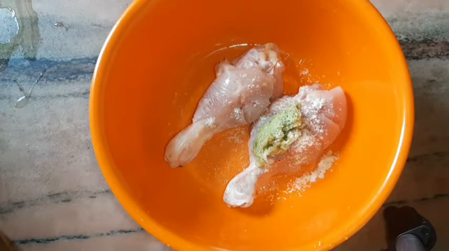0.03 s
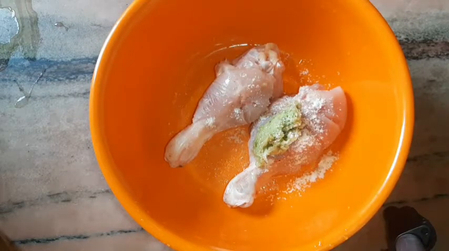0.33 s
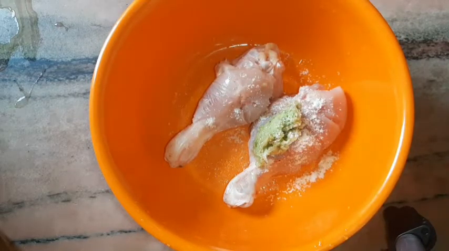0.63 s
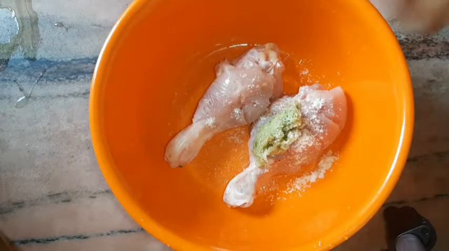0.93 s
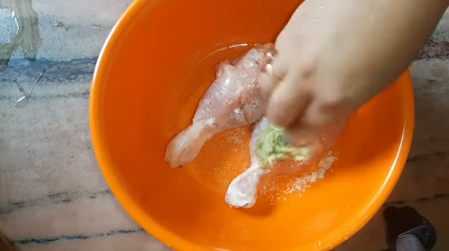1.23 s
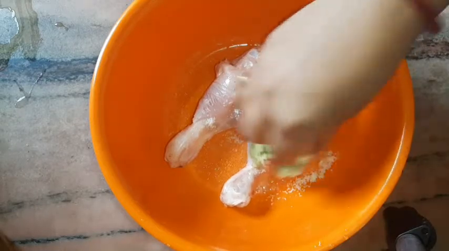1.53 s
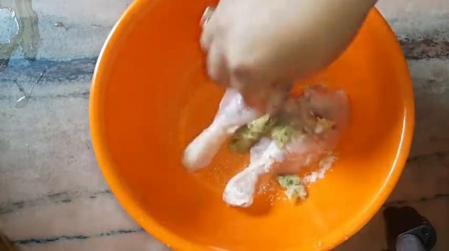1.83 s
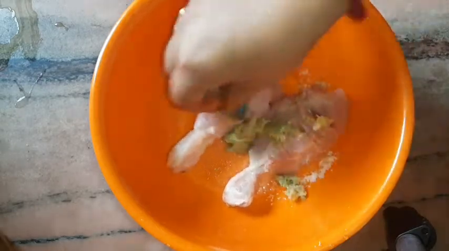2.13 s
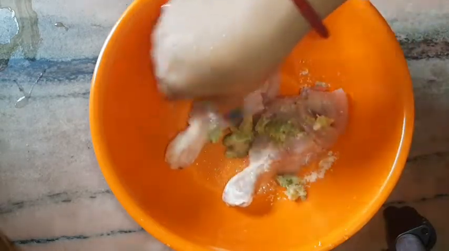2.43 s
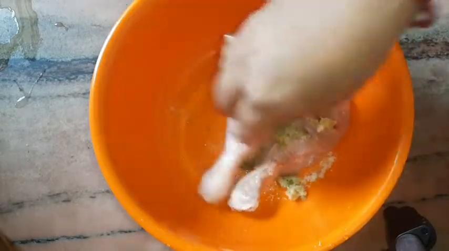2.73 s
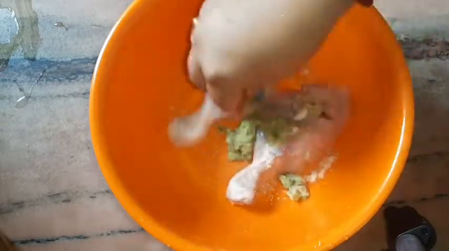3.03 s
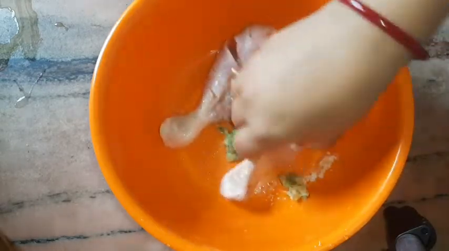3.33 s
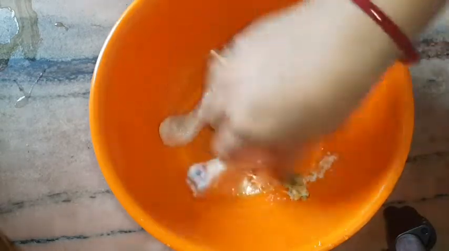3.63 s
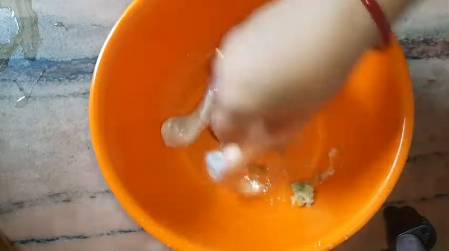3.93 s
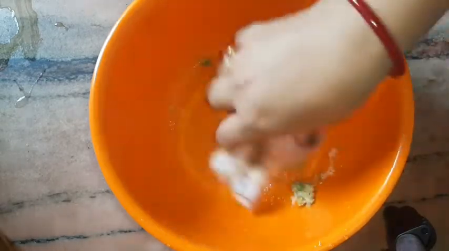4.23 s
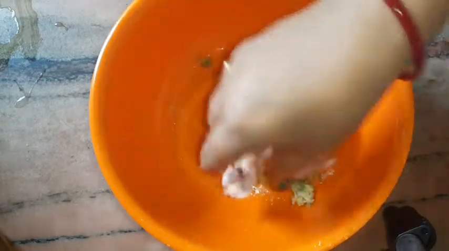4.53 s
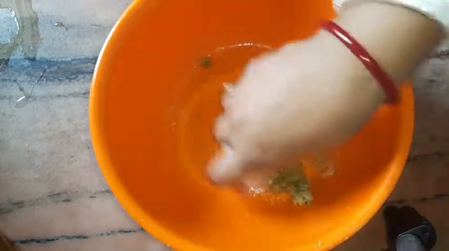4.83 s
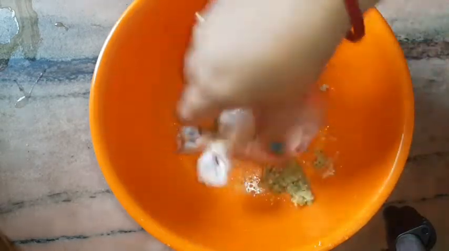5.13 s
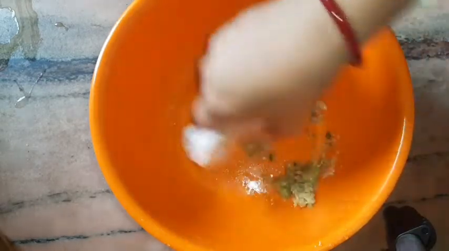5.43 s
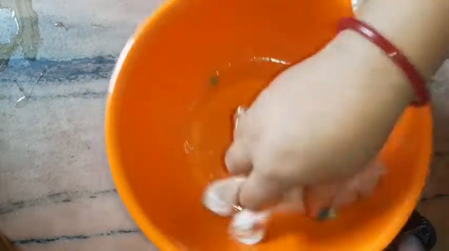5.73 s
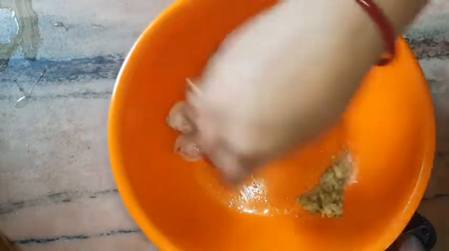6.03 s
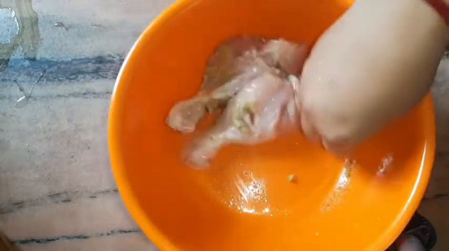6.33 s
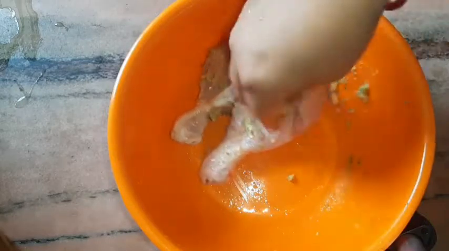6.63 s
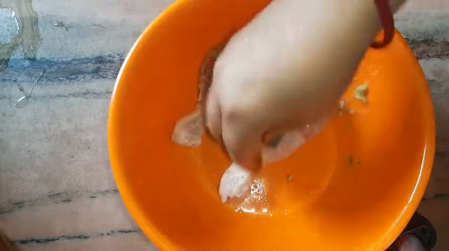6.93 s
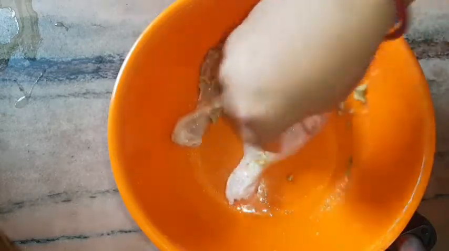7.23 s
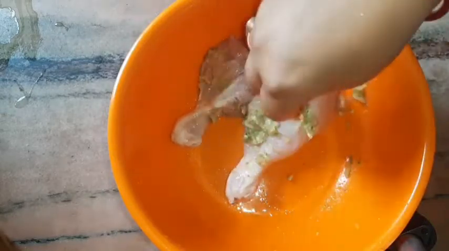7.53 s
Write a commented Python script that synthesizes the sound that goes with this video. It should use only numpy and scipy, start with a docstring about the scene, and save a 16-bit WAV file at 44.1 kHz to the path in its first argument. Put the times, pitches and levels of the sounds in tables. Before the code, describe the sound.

A hand kneads raw chicken in a plastic bowl, with wet smacks, soft thuds and sharp bangle clacks over a faint hiss.

```python
"""Rubbing paste into chicken

A hand kneads raw chicken in a plastic bowl on a stone counter, close by. The meat thuds on the bowl's
modes, wet skin smacks, air pockets pop, a bangle clacks on the rim, and once the bowl skids in a
stick-slip judder. Behind it a small kitchen rumbles and a thin jet, like steam leaking from a pot lid,
hisses and whistles faintly."""
import sys
import numpy as np
from scipy import signal
from scipy.fft import rfft, irfft, next_fast_len
from scipy.io import wavfile
from scipy.ndimage import uniform_filter1d, map_coordinates

SR = 44100
rng = np.random.default_rng(int(sys.argv[2]) if len(sys.argv) > 2 else 0)


def store_wav(level_fs):
    """Save 16-bit WAV to argv[1]."""
    pcm = np.round(np.clip(np.atleast_2d(level_fs), -1, 1) * 32767)
    wavfile.write(sys.argv[1], SR, pcm.T.astype(np.int16))


N = 338688
TOP_HZ = 15800
RING_T = np.arange(SR // 3) / SR  # time since a contact [s]

# knocks on the bowl, thuds of meat and hand, then jolts as it skids: (time [s], level [dB], pitch [Hz])
BUMP_HITS = [(1.894, -51.5, 716), (2.475, -43, 450), (2.56, -36.5, 805), (2.741, -45, 590),
             (3.257, -43.5, 574), (3.887, -45.5, 597), (4.055, -42, 663), (4.157, -52, 706),
             (4.404, -53, 810), (4.555, -51, 720), (4.675, -47, 750), (5.0, -51.5, 570),
             (5.156, -44.5, 810), (5.182, -47.5, 860), (5.293, -48, 830), (5.309, -51, 700),
             (5.406, -51.5, 656), (5.585, -30, 460), (5.648, -36, 533), (5.68, -29, 1534), (5.73, -30, 474),
             (5.792, -36, 395)]
# wet skin slapping and tearing loose: (time [s], level [dB], low edge [Hz], high edge [Hz])
SMACK_HITS = [(2.476, -42.5, 1380, 6670), (2.56, -52, 1090, 2620), (3.257, -36.5, 2800, 15000),
              (3.5221, -34.5, 2600, 9000), (4.0543, -35, 3540, 15300), (4.147, -49, 3480, 13000),
              (4.157, -44, 3000, 13000), (4.676, -42, 2400, 15500), (4.876, -54, 1500, 3200),
              (5.157, -48.5, 1200, 2200), (5.181, -53, 1190, 3800), (5.308, -51.5, 1090, 4500),
              (5.585, -45, 1090, 4600), (5.641, -43.5, 1500, 12000), (6.254, -52, 3500, 5500),
              (7.339, -47, 4570, 15000)]
# dull contact: (frequency [Hz], density [dB])
THUD_SPECTRUM = [(80, -32), (250, -6.5), (450, 1), (650, 1), (900, -4), (1150, -8), (2500, -31),
                 (6000, -31.5)]


def amp(db):
    """Decibels to gain."""
    return 10 ** (np.asarray(db) / 20)


def unit(x):
    """Scale to rms 1."""
    return x / np.sqrt(np.mean(x ** 2) + 1e-20)


def struck(x):
    """Scale a blow to rms 1 over its first 10 ms."""
    return x / np.sqrt(np.mean(x[..., :SR // 100] ** 2) + 1e-20)


def since(s):
    """Time since s per sample, zero before it."""
    return np.maximum(np.arange(N) / SR - s, 0)


def along(points, hz):
    """Interpolate (frequency, value) points on a log axis."""
    knots_hz, values = np.transpose(points)
    return np.interp(np.log(hz + 1), np.log(knots_hz), values)


def curves(rows):
    """One value per sample for each column after the time."""
    s, *columns = np.transpose(rows)
    return [np.interp(since(0), s, column) for column in columns]


def wobble(rate_hz):
    """Smooth random curve with knots at rate_hz."""
    knots = rng.standard_normal(int(N * rate_hz / SR) + 4)
    return map_coordinates(knots, [np.arange(N) * rate_hz / SR])


def add(track, s, sound):
    """Mix a sound in at time s."""
    part = track[:, max(round(s * SR), 0):][:, :sound.shape[1]]
    part += sound[:, :part.shape[1]]


def band(low_hz, high_hz, tilt_db, skirt_db):
    """Spectrum tilted between two edges, falling skirt_db per octave outside."""
    return [(low_hz / 4, -2 * skirt_db), (low_hz, 0),
            (high_hz, tilt_db), (high_hz * 4, tilt_db - 2 * skirt_db)]


def colour(pair, spectrum):
    """Minimum-phase filter two independent signals and blend them to stereo."""
    # left-right likeness: (frequency [Hz], correlation [-])
    likeness = [(30, .4), (100, .75), (250, .6), (700, .35), (1500, .4), (3000, 0), (15000, -.05)]
    n = pair.shape[1]
    m = 2 * next_fast_len(n // 2 + 2048)
    hz = np.fft.rfftfreq(m, 1 / SR)
    cepstrum = irfft(np.log(amp(along(spectrum, hz))))
    cepstrum[1:m // 2] *= 2
    cepstrum[m // 2 + 1:] = 0
    shaped = rfft(pair, m) * np.exp(rfft(cepstrum))
    turn = np.arccos(np.clip(along(likeness, hz), -1, 1)) / 2
    mid, side = irfft(shaped * [np.cos(turn), np.sin(turn)])[:, :n]
    return np.array([mid + side, mid - side])


def noise(spectrum, envelope=1):
    """Stereo noise of rms 1, enveloped before it is coloured."""
    return unit(colour(envelope * rng.standard_normal((2, N)), spectrum))


def attack(rise_s):
    """Exponential onset of a contact."""
    return 1 - np.exp(-RING_T / rise_s)


def burst(spectrum, t60_s, rise_s):
    """A contact's dense, quickly dying vibration."""
    envelope = amp(-60 * RING_T / t60_s) * attack(rise_s)
    return struck(colour(envelope * rng.standard_normal((2, len(RING_T))), spectrum))


def patchy(x, depth_db=3.0):
    """Narrow patches of a noise swell and sink independently."""
    bins = signal.stft(x, nperseg=1024)[2]
    field = uniform_filter1d(rng.standard_normal(bins.shape[1:]), size=4, axis=0)
    field = uniform_filter1d(field, size=12, axis=1)
    return unit(signal.istft(bins * amp(depth_db * unit(field)), nperseg=1024)[1][:, :N])


def rumble(level_db=-59.0, drift_db=1.2):
    """Low kitchen background, drifting in level."""
    # room noise: (frequency [Hz], density [dB])
    spectrum = [(20, -25), (50, -17.5), (75, -1), (115, -4.5), (200, -11.5), (270, -19), (450, -19.5),
                (950, -29.5), (1300, -28.5), (1540, -24), (1750, -37), (2060, -27.5), (2300, -38),
                (3000, -49), (6000, -65)]
    return amp(level_db + drift_db * wobble(5)) * noise(spectrum)


def registers(hop_s=0.055, swell_s=0.0089, fade_db_per_s=5.5):
    """Whistle pitch [Hz] and level [dB]: after each hop it builds, glides and fades."""
    # register hops: (time [s], pitch [Hz], glide [Hz/s], level [dB])
    hops = [(0, 6370, -1050, -56), (.43, 9200, 2997.5, -61.5), (.68, 9850, -1200, -60),
            (.96, 10110, -700, -59), (1.8, 9480, -700, -62), (2.67, 6690, -400, -57),
            (2.77, 6610, -40, -51.5), (3.12, 6500, -51, -54), (3.33, 6680, 197.5, -57),
            (3.7, 7620, 1301, -65), (4.02, 9160, -260, -60.5), (5.92, 6600, -200, -55),
            (6.4, 6330, -100, -54), (6.71, 5990, -100, -57), (6.84, 8630, -48.5, -60.5),
            (7.58, 6670, -1400, -52)]
    start_s, hz, glide, db = np.transpose(hops)
    t = since(0)
    k = np.maximum(np.searchsorted(start_s, t, "right") - 1, 0)
    age_s = np.maximum(t - start_s[k], 0)
    pitch_hz = hz[k] + glide[k] * age_s
    level_db = db[k] - fade_db_per_s * age_s - 10 * np.exp(-age_s / swell_s)
    return uniform_filter1d(np.array([pitch_hz, level_db]), int(hop_s * SR) + 1, axis=1)


def whistle(hz, db, width_hz, airy_hz=8300, wander=0.0039, falter_db=1.5):
    """Wavering edge tone: narrow noise, a skirt of turbulence and a weak octave."""
    def partial(k, rate_hz):
        sides = [wobble(rate_hz) * np.cos(k * phase) + wobble(rate_hz) * np.sin(k * phase)
                 for _ in range(2)]
        return unit(np.array(sides))

    airy = (hz / airy_hz) ** 3  # turbulence-to-tone ratio
    unrest = np.minimum(airy, 1)
    detune = wander * unrest * (wobble(22) + wobble(7)) / np.sqrt(2)
    phase = 2 * np.pi * np.cumsum(hz * (1 + detune)) / SR
    octave = amp(-12) * (2 * hz < TOP_HZ) * partial(2, 1.3 * width_hz)
    gain = amp(db + falter_db * (wobble(16) + unrest * wobble(5)))
    tone = (partial(1, width_hz) + airy * partial(1, 8 * width_hz)) / np.hypot(1, airy)
    return gain * (tone + octave)


def steam():
    """A thin jet hisses and whistles on the edge of its gap."""
    # hiss following the leak's flow: (time [s], level [dB])
    flow = [(.37, -53), (.52, -57.5), (1.2, -58.5), (1.9, -57.5), (2.05, -55.5), (2.6, -53.5), (3.95, -52),
            (4.1, -56), (5.5, -54.5), (5.85, -52), (6.75, -53), (6.9, -55), (7.52, -56.5), (7.62, -52.5)]
    # body of the hiss: (frequency [Hz], density [dB])
    hiss_spectrum = [(1500, -34.5), (3000, -20), (5000, -11), (6300, -4), (7100, -1), (7900, -1.5),
                     (8600, -14.5), (10000, -21), (15000, -48)]
    # top of the hiss: (frequency [Hz], density [dB])
    fizz_spectrum = [(6000, -17.5), (9000, -2), (10500, 3.5), (11300, 4.5), (12200, 0), (14000, 0.5),
                     (15400, 7), (16000, -3.5)]
    # second, steadier whistle: (time [s], pitch [Hz], level [dB])
    overblow = [(0, 10820, -63.5), (2.6, 10700, -65.5), (3.4, 10730, -62), (3.9, 10400, -69),
                (4.3, 10550, -67), (6.1, 9880, -71), (6.5, 9880, -80)]
    hiss_db, = curves(flow)
    fizz_db = -56 + 0.94 * (hiss_db - hiss_db.mean())
    flutter_db = .4 * wobble(12)
    hiss = amp(hiss_db + flutter_db) * patchy(noise(hiss_spectrum))
    fizz = amp(fizz_db + flutter_db) * patchy(noise(fizz_spectrum))
    tones = whistle(*registers(), width_hz=95) + whistle(*curves(overblow), width_hz=70)
    return (hiss + fizz + tones) * amp([[.85], [-.85]])  # slightly left


def swishes(rough_db=1.0):
    """Sleeve and fingers brush along, each stroke in its own band."""
    # strokes: (centre [s], width [s], low edge [Hz], high edge [Hz], level [dB])
    strokes = [(0.787, 0.17, 2740, 7140, -57), (0.846, 0.18, 1300, 2400, -64.5),
               (1.76, 0.1, 6400, 8100, -55.5), (4.23, 0.067, 1400, 1670, -61),
               (4.257, 0.12, 11000, 15000, -52.5), (4.766, 0.14, 830, 1250, -58)]
    out = np.zeros((2, N))
    for s, width_s, low_hz, high_hz, db in strokes:
        swell = amp(db) * np.exp(-2 * ((since(0) - s) / width_s) ** 2)
        spectrum = band(low_hz, high_hz, tilt_db=-3.0, skirt_db=22)
        out += swell * noise(spectrum, amp(rough_db * wobble(200)))
    return out


def slither(level_db=-21.5, rise_s=0.031, t60_s=0.16):
    """Gain of the meat sliding to rest after each bump and smack."""
    power = np.zeros((1, N))
    t = np.arange(SR // 2) / SR
    envelope = (1 - np.exp(-t / rise_s)) * amp(-60 * t / t60_s)
    for s, db, *_ in BUMP_HITS + SMACK_HITS:
        add(power, s, (amp(db) * envelope[None] / envelope.max()) ** 2)
    return amp(level_db) * np.sqrt(power[0])


def rubbing(spread_db_per_s=2.5, smear_db=-4):
    """Fingers drag and knead the meat; the paste crackles in clumps, more as it spreads."""
    # hand effort: (time [s], level [dB])
    effort = [(1.2, -73.5), (1.78, -63.5), (2.0, -77), (2.49, -69.5), (2.65, -61), (3.15, -57),
              (3.61, -66.5), (3.85, -59), (4.4, -61.5), (5.62, -64), (5.89, -58), (5.99, -63), (6.89, -66),
              (7.55, -71.5)]
    # paste crackle: (frequency [Hz], density [dB])
    paste_spectrum = [(700, 5), (1500, -4.5), (2200, 12), (3000, 11), (4500, 16.5), (7000, -32),
                      (15000, -18)]
    # kneading: (frequency [Hz], density [dB])
    knead_spectrum = [(50, -19.5), (130, 4.0), (220, -11.0), (500, -10.5), (2000, -76.0)]
    effort_db, = curves(effort)
    effort_db -= effort_db.mean()
    elapsed_s = since(effort[0][0])
    sliding, clumps = slither(), wobble(25)
    grains = amp(0.93 * wobble(1100) + 2 * clumps)
    drag_gain = np.hypot(amp(-77 + 1.57 * effort_db), sliding)
    drag = drag_gain * noise(THUD_SPECTRUM, amp(2.5 * np.tanh(clumps)))
    spread_db = spread_db_per_s * (elapsed_s - elapsed_s.mean())
    paste_gain = np.hypot(amp(-75.5 + 1.3 * effort_db + spread_db), amp(smear_db) * sliding)
    paste = paste_gain * noise(paste_spectrum, grains)
    knead = amp(-62 + 0.7 * effort_db) * noise(knead_spectrum, amp(9.9 * np.tanh(wobble(19))))
    fade_in = np.minimum(10 * elapsed_s, 1)
    return fade_in * (drag + paste + knead)


def bangle_ring(ping_hz, damping, favour_db=4, favour_width_hz=130):
    """Short bright modes; the contact point favours those near ping_hz."""
    # bangle on the rim: (frequency [Hz], level [dB], t60 before damping [s])
    mode_table = [(3560, -5, .022), (3680, -7, .025), (3798, -3, .03), (3953, -1, .042), (4113, -1, .036),
                  (4263, -2, .038), (4540, -3, .034), (5790, -9, .034), (6013, -7, .036), (6380, -5, .032),
                  (6720, -8, .028), (7800, -9, .034)]
    hz, db, t60_s = np.transpose(mode_table)[:, :, None]
    boost_db = favour_db / (1 + ((hz - ping_hz) / favour_width_hz) ** 2)
    gain = amp(db + boost_db + rng.normal(0, 1.5, (2, *hz.shape)))
    phase = rng.uniform(0, 2 * np.pi, gain.shape)
    modes = gain * amp(-60 * RING_T * damping / t60_s) * np.sin(2 * np.pi * hz * RING_T + phase)
    return struck(modes.sum(1) * attack(0.0011))


def bowl_modes(damping, focus_hz, focus_db_per_oct):
    """Separate modes, damped by meat and hand; a blow drives those near focus_hz most."""
    # plastic bowl: (frequency [Hz], level [dB], t60 before damping [s])
    mode_table = [(348, -1, .25), (385, -8, .12), (425, -9, .1), (464, 0, .22), (533, -3, .12),
                  (603, -3, .17), (695, 1, .18), (780, -3, .2), (821, -8, .2), (861, -9, .17),
                  (903, -8, .2), (1281, -13, .12), (1429, -12, .12), (1534, -4, .13), (1670, -15, .11),
                  (2040, -14, .1)]
    hz, db, t60_s = np.transpose(mode_table)[:, :, None]
    gain = amp(db + rng.normal(0, 1.5, hz.shape) - focus_db_per_oct * abs(np.log2(hz / focus_hz)))
    phase = rng.uniform(0, 2 * np.pi, hz.shape) + rng.normal(0, .6, (2, *hz.shape))
    return gain * amp(-60 * RING_T * damping / t60_s) * np.sin(2 * np.pi * hz * RING_T + phase)


def bowl_ring(damping, focus_hz, focus_db_per_oct):
    """The bowl struck once."""
    return struck(bowl_modes(damping, focus_hz, focus_db_per_oct).sum(1) * attack(0.00026))


def clacks():
    """The bangle hits the rim, pings, knocks the bowl's body and wall, and rebounds once."""
    # rim hits: (time [s], level [dB], rebound delay [s], rebound loss [dB], ping [Hz],
    # crack hardness [dB], wrist damping [-], left minus right [dB])
    hits = [(1.5592, -30.5, .0028, 9, 4550, 2, .5, 0), (2.9565, -21, .009, 12, 4120, 0.5, 1.2, -2),
            (3.2825, -24.5, .0105, 6, 4040, -2, 1.2, -1), (3.766, -22, .0065, 5, 3900, -2, 1.5, 3.5)]
    # hard contact: (frequency [Hz], density [dB])
    crack_spectrum = [(200, -66), (700, -3), (1150, -11.5), (2800, -16), (3600, 4.5), (4500, 0),
                      (5200, -2.5), (6300, 3.5), (8000, -2), (8800, -8), (11000, -5), (15500, -4.5)]
    out = np.zeros((2, N))
    for s, db, flight_s, loss_db, ping_hz, hard_db, damping, pan_db in hits:
        pan = amp([[pan_db / 2], [-pan_db / 2]])
        for at_s, hit_db in ((s, db), (s + flight_s, db - loss_db)):
            ping = amp(-2.5) * bangle_ring(ping_hz, damping)
            crack = amp(hard_db - 1.5) * burst(crack_spectrum, t60_s=0.017, rise_s=0.0013)
            body = amp(-16) * bowl_ring(damping=2.0, focus_hz=637, focus_db_per_oct=26)
            wall = amp(-24) * bowl_ring(damping=2.0, focus_hz=2100, focus_db_per_oct=32)
            add(out, at_s - .0005, amp(hit_db) * pan * (ping + crack + body + wall))
    return out


def presses():
    """The bowl's base flexes against the counter with a low thump."""
    # heavy presses: (time [s], pitch [Hz], level [dB], t60 [s])
    thumps = [(1.57, 88, -38, 0.16), (1.602, 95.7, -32, 0.075), (2.482, 146.5, -42.5, 0.34),
              (4.676, 195, -40.5, 0.1), (5.585, 161, -39.5, 0.099), (5.682, 172, -37.5, 0.11)]
    out = np.zeros((2, N))
    for s, hz, db, t60_s in thumps:
        thump = amp(db - 60 * RING_T / t60_s) * np.sin(2 * np.pi * hz * RING_T) * attack(0.001)
        add(out, s, np.array([thump, thump]))
    return out


def bumps():
    """Knocks ring the bowl: thuds of meat and hand, then jolts as it skids."""
    out = np.zeros((2, N))
    for s, db, hz in BUMP_HITS:
        spectrum = band(0.79 * hz, 1.05 * hz, tilt_db=5.5, skirt_db=23.0)
        knock = burst(spectrum, t60_s=0.028, rise_s=0.00082)
        ring = bowl_ring(damping=2.65, focus_hz=hz, focus_db_per_oct=10)
        add(out, s, amp(db - 5) * (knock + ring))
    return out


def smacks(threads=4, mean_lag_s=.014, thread_db=-15):
    """Wet skin parts with a snap; sticky threads crackle after it."""
    out = np.zeros((2, N))
    for s, db, low_hz, high_hz in SMACK_HITS:
        tear = band(low_hz, high_hz, tilt_db=-0.5, skirt_db=15)
        add(out, s, amp(db) * burst(tear, t60_s=0.019, rise_s=0.00037))
        for lag_s, scatter_db in zip(rng.exponential(mean_lag_s, threads), rng.normal(0, 2, threads)):
            snap = burst(tear, t60_s=.006, rise_s=.0002)
            add(out, s + lag_s, amp(db + thread_db + scatter_db) * snap)
    return out


def pops(t60_cycles=30):
    """Air pockets burst under the skin: a brief tone inside a spray of paste. The first row is instead a light
    touch of the bangle on the rim, played the same way."""
    # air pockets, the first row a light bangle touch on the rim: (time [s], level [dB], pitch [Hz])
    pockets = [(3.225, -42.5, 4300), (3.518, -40, 2700), (4.176, -52, 2780), (4.404, -49.5, 4060),
               (4.676, -47.5, 1505), (5.155, -48.5, 1510), (5.293, -53.5, 3380), (5.641, -51, 1510),
               (6.364, -57, 2200), (6.745, -47, 2650)]
    out = np.zeros((2, N))
    for s, db, hz in pockets:
        spray = burst(band(hz / 1.15, hz * 1.15, tilt_db=0, skirt_db=20), t60_s=.03, rise_s=.0015)
        phase = 2 * np.pi * hz * RING_T + rng.normal(0, 1, (2, 1))
        tone = struck(np.sin(phase) * amp(-60 * RING_T * hz / t60_cycles) * attack(2 / hz))
        add(out, s, amp(db) * (tone / 2 + amp(-2) * spray))
    return out


def skid(start_s=5.677, length_s=0.26, slip_hz=170, fall_db_per_s=245):
    """The foot sticks and slips on stone; each slip kicks the bowl, weaker as it slows."""
    out, kicks = np.zeros((2, N)), np.zeros(len(RING_T))
    slips_s = np.arange(0, length_s, 1 / slip_hz)
    slips_s += rng.random(len(slips_s)) / slip_hz
    sizes = amp(-24.5 - fall_db_per_s * slips_s)
    for s, size in zip(slips_s, sizes):
        add(out, start_s + s, size * amp(-9) * burst(THUD_SPECTRUM, t60_s=0.0084, rise_s=0.00055))
    kicks[np.round(slips_s * SR).astype(int)] = sizes
    modes = bowl_modes(damping=1.7, focus_hz=500, focus_db_per_oct=0)
    driven = signal.fftconvolve(modes, kicks[None, None], axes=2)
    # each mode keeps its own share of the energy
    driven *= np.linalg.norm(modes, axis=2, keepdims=True) / np.linalg.norm(driven, axis=2, keepdims=True)
    add(out, start_s, amp(-5) * np.linalg.norm(sizes) * driven.sum(1))
    return out + grit(start_s)


def grit(start_s, level_db=-38.5, rise_s=0.0014, hold_s=0.073, fall_db_per_s=700):
    """Grit scrapes under the sliding foot."""
    # scrape: (frequency [Hz], density [dB])
    spectrum = [(300, -6), (1500, -8), (2300, -4.5), (2900, -0.5), (4000, -1.5), (6000, -1.5), (8000, -18),
                (15500, -9.5)]
    onset = 1 - np.exp(-since(start_s) / rise_s)
    gain = amp(level_db - fall_db_per_s * since(start_s + hold_s))
    return onset * gain * noise(spectrum, amp(0.8 * wobble(500)))


def rasp(start_s=7.615, rise_s=0.033, level_db=-51):
    """A last firm stroke grinds salt along the skin."""
    # grinding: (frequency [Hz], density [dB])
    spectrum = [(300, -8), (700, -3), (1000, -8), (1400, 3), (1850, -10), (2200, -2), (3000, -22),
                (6000, -21), (12000, -43)]
    onset = np.minimum(since(start_s) / rise_s, 1)
    return amp(level_db) * onset * noise(spectrum, amp(1.3 * wobble(300)))


def kitchen(x, gap_s=.006, wet_db=-7.5):
    """Hard walls close by return a short, bright tail."""
    # room decay: (frequency [Hz], t60 [s])
    decay = [(100, 0.71), (400, 0.3), (1000, 0.34), (4000, 0.27), (8000, 0.25), (15000, 0.24)]
    hz, t, bins = signal.stft(rng.standard_normal((2, SR // 2)), SR, nperseg=256)
    tail = signal.istft(bins * amp(-60 * t / along(decay, hz)[:, None]), SR, nperseg=256)[1]
    tail = colour(tail, [(100, -3.5), (700, 2.5), (4000, 0.5), (14000, -2.5)])
    tail = np.pad(tail / np.linalg.norm(tail[0]), ((0, 0), (round(gap_s * SR), 0)))
    return amp(wet_db) * signal.fftconvolve(x, tail, axes=1)[:, :N]


def radiate(x):
    """The bowl radiates each frequency unevenly to left and right."""
    # balance: (frequency [Hz], left minus right [dB])
    balance = [(150, 0), (340, -7), (470, -2), (630, 6), (850, 5), (1300, -2), (2400, 1), (4000, -.5),
               (15000, .7)]
    m = next_fast_len(N + SR // 2)
    lean_db = along(balance, np.fft.rfftfreq(m, 1 / SR)) / 2
    return irfft(rfft(x, m) * amp([lean_db, -lean_db]), m)[:, :N]


def scene():
    """Bowl contacts with their room tail, hand work and background."""
    hard = clacks()
    soft = bumps() + smacks() + pops() + skid()
    contacts = radiate(hard + soft + kitchen(hard) + kitchen(soft))
    return contacts + presses() + rubbing() + swishes() + rasp() + rumble() + steam()


def record(dry):
    """Brick-wall low-pass at TOP_HZ."""
    m = next_fast_len(N + SR // 2)
    passband = np.fft.rfftfreq(m, 1 / SR) < TOP_HZ
    return irfft(rfft(dry, m) * passband, m)[:, :N]


dry = scene()
out = record(dry)
store_wav(out)
```